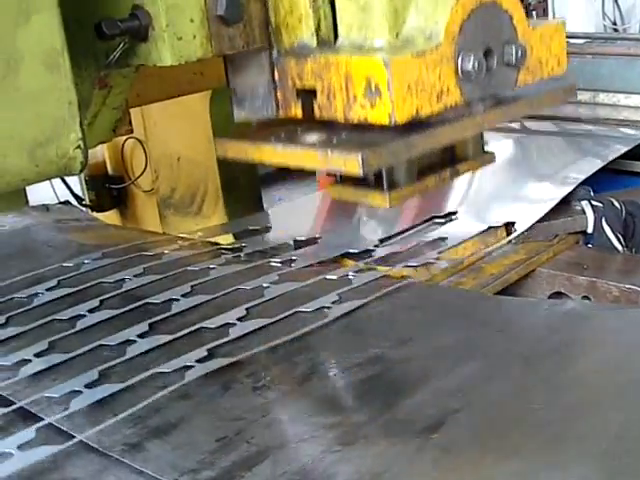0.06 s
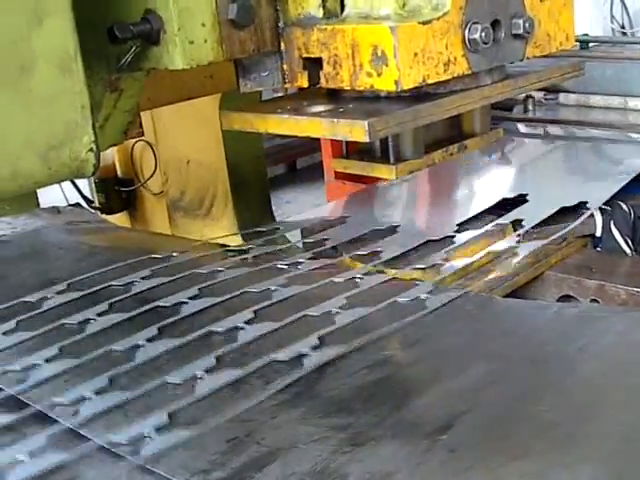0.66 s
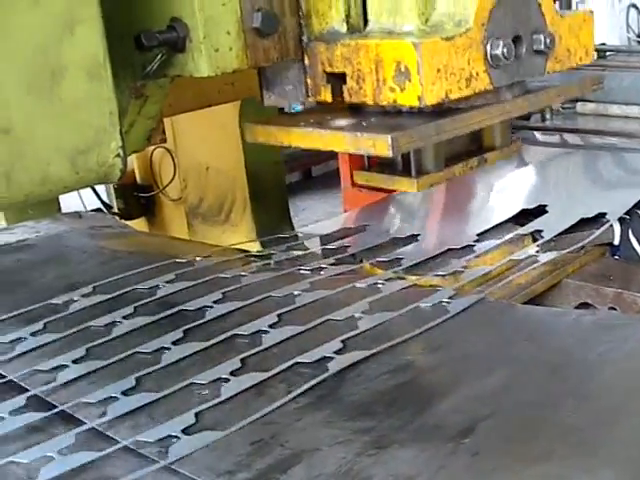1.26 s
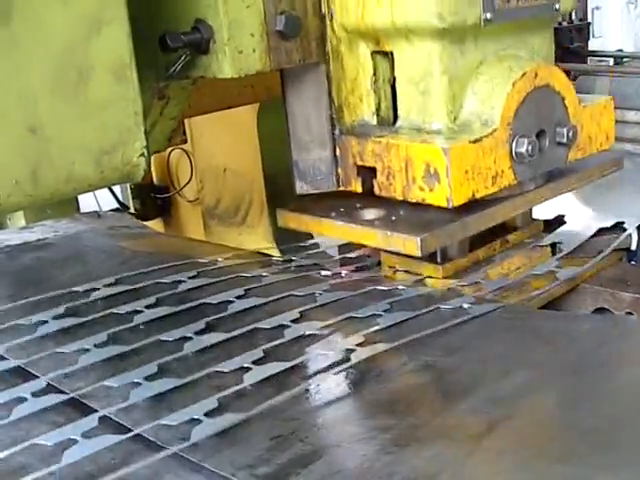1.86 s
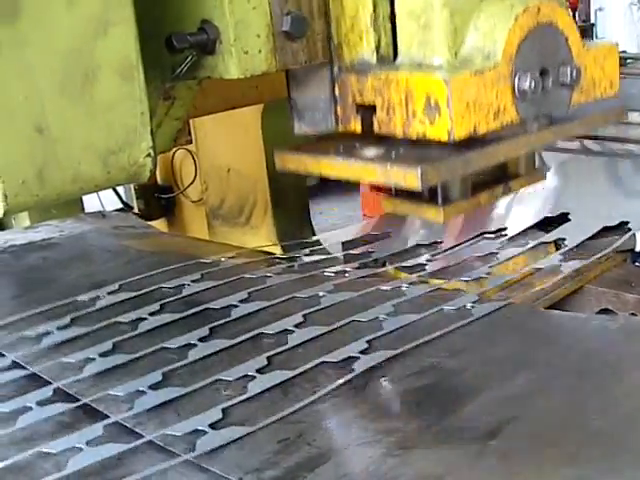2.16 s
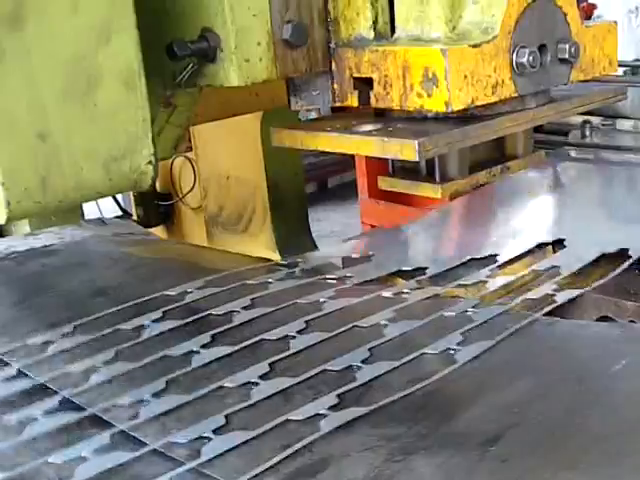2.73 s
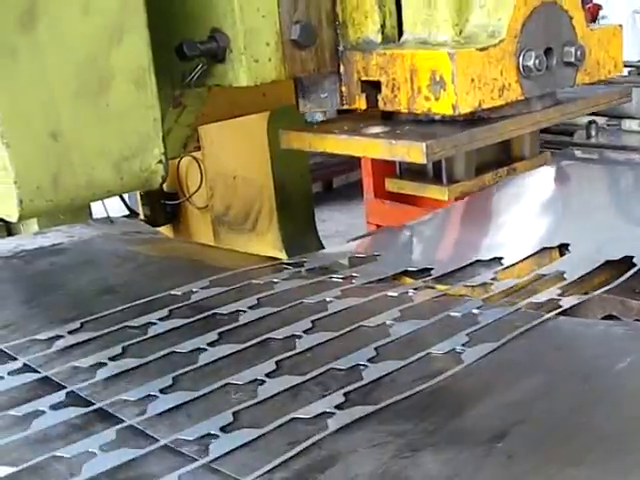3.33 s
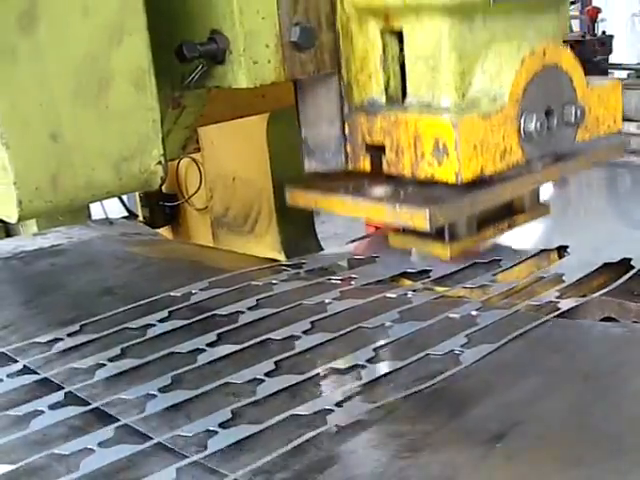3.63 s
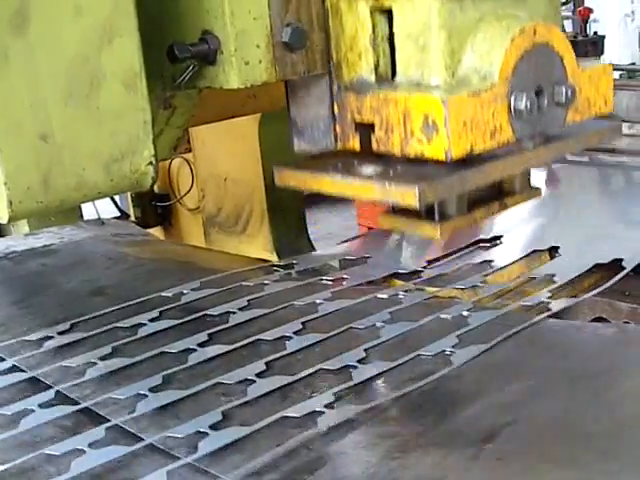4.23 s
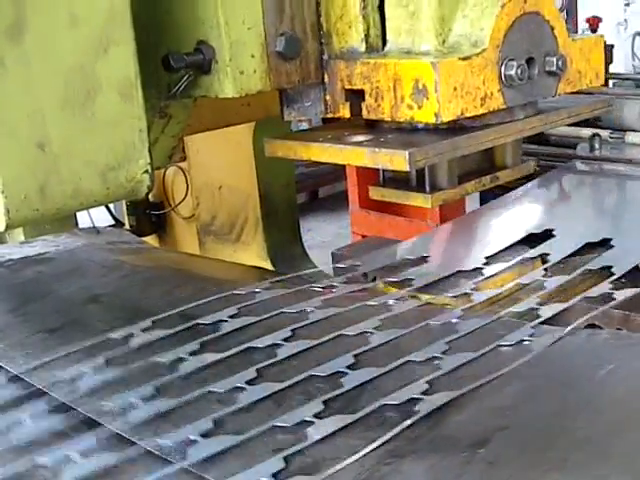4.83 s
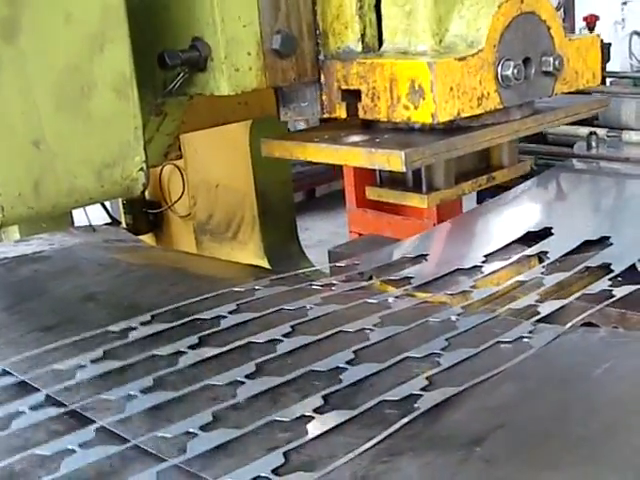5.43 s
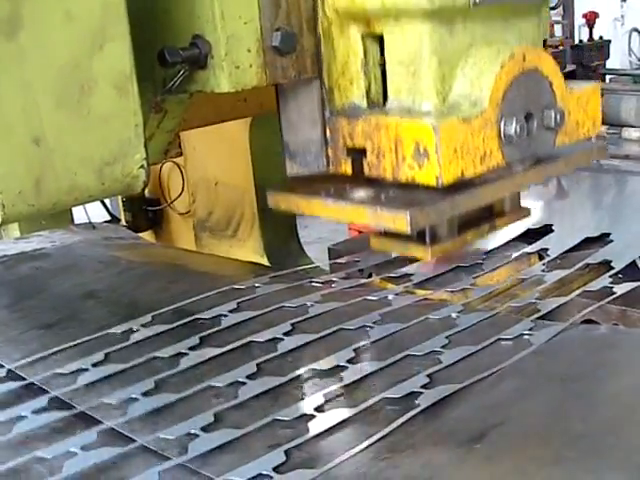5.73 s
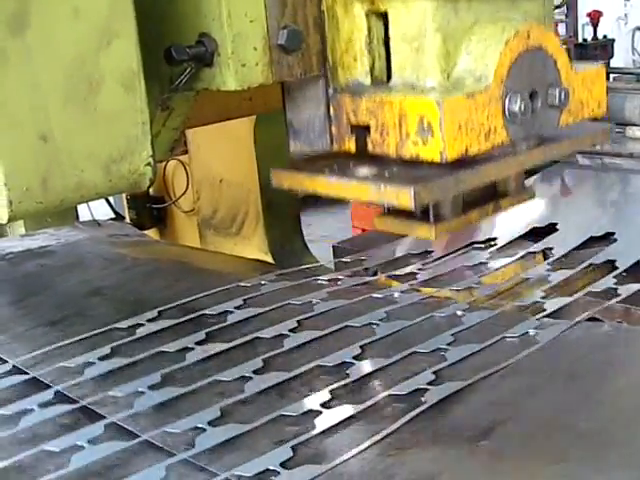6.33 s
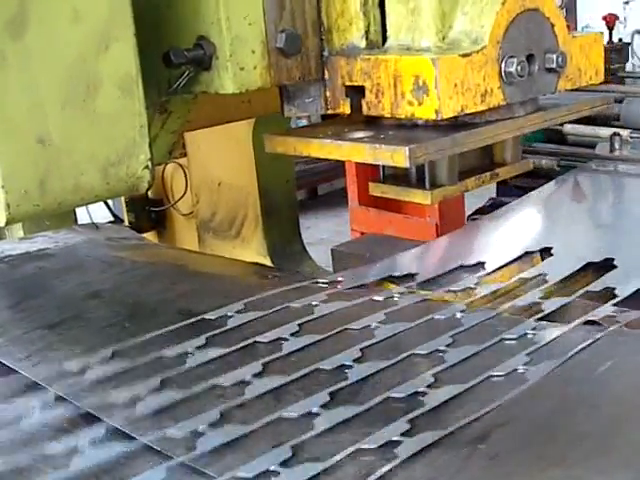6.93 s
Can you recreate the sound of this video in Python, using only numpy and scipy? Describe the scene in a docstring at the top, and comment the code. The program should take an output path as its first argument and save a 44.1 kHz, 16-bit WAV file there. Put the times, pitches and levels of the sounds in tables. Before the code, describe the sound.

Over droning factory machinery, a power press clacks, thuds and rattles through three evenly spaced strokes on a metal sheet.

```python
"""A humming workshop, where a flywheel punch press blanks a steel sheet three times.
Each cycle the clutch key clacks in, the ram grinds down, the die lands and snaps through, the frame
booms, the punch strips out with a rattle and the key ticks free. The freed flywheel rubs until the
next stroke, while the sheet buckles as it is pushed on. Gear whine swells briefly and metal squeaks.
It all comes through a narrow-band recorder that squashes the blows."""
import sys
import numpy as np
from scipy import signal
from scipy.fft import rfft, irfft, next_fast_len
from scipy.io import wavfile
from scipy.ndimage import map_coordinates

SR = 44100
rng = np.random.default_rng(int(sys.argv[2]) if len(sys.argv) > 2 else 0)


def log_audio(samples):
    """Write samples as a 16-bit WAV file to the path given in sys.argv[1]."""
    # one column per channel
    frames = np.atleast_2d(samples).T
    # limit to full scale, then quantise
    limited = np.clip(frames, -1, 1)
    pcm = np.round(limited * 32767).astype(np.int16)
    wavfile.write(sys.argv[1], SR, pcm)


N = 316638

# Room tone of the machines all round: freq_hz, level_db
SHOP_SPECTRUM = [(15, -53), (25, -24.5), (107, -9), (140, -6), (247, -4.2), (346, -4.2), (384, -10.5),
                 (418, -6.5), (549, -7.5), (802, -11.5), (929, -12), (1030, -17), (1300, -19.8),
                 (1390, -23), (3800, -28.2), (4940, -24.5), (8360, -120)]
# Whine of the drive and gears: pitch_hz, level_db, width_hz, sag_loss_db
GEAR_TONES = [(144.8, -37.5, 9.2, 0), (201.3, -35.7, 30, 0), (680, -38, 22, 1), (934.4, -39.3, 19, 1),
              (1320, -45, 27, 3), (1660, -44.5, 32, 6), (3540, -55.5, 75, 5), (3740, -52.5, 40, 5)]
# Reverb time of the hall: freq_hz, t60_s
HALL_DECAY = [(100, 0.49), (550, 1), (1200, 0.36), (2500, .35), (3800, .3)]
# Colour of its tail: freq_hz, level_db
HALL_SPECTRUM = [(50, -0.5), (140, 5), (300, 2), (430, 2), (580, 6.5), (800, 2.5), (1100, 1), (2000, -1.5),
                 (3800, -10)]
# Swells of gear whine near 1660 Hz and higher metallic squeaks: start_s, length_s, pitch_hz, level_db
WHINES_AND_SQUEAKS = [(0.3, 0.26, 1643, -37), (0.506, 0.17, 2540, -37.5), (0.78, 0.095, 1663, -34.5),
                      (2.604, 0.051, 1680, -31), (2.925, 0.057, 2490, -33.5), (3.011, 0.048, 2366, -33),
                      (6.764, 0.13, 1670, -37)]
# Pushes that buckle the sheet: start_s, level_db
SHEET_SHOVES = [(3.071, -20), (4.936, -20), (4.956, -17), (4.990, -17.5), (5.016, -17.5)]
# Hollow honk of the buckling sheet: freq_hz, level_db
BUCKLE_SPECTRUM = [(150, -14.5), (520, -14.5), (640, -7.5), (680, 14), (730, -5.5), (820, 1), (950, 1.5),
                   (1400, -9), (3800, -18)]
# Press cycles, the first already under way: start_s, extra_ring_db, extra_snap_db, extra_rub_db
PRESS_CYCLES = [(-1.025, -2, 0, 1), (1.0805, 1.5, -1.5, -1), (3.1845, 0, 0.5, 0), (5.284, -1, 2, 0.3)]
# Steel rubbing in the hub and slideways: freq_hz, level_db
SCRAPE_SPECTRUM = [(100, -10), (200, 5), (400, -11), (700, 5.5), (1100, -1), (1700, 0.5), (2050, -2.5),
                   (2450, 0), (3000, -4.5), (3750, 0.5)]
# Growl of the loaded gears: freq_hz, level_db
GRIND_SPECTRUM = [(120, -4), (200, -5.5), (500, -6.5), (690, 0), (1100, -6), (1330, -2.5), (1500, -14),
                  (1720, -2), (2000, -20), (3800, -23)]
# The key bites, rebounds, seats, later pulls free and is nicked twice: cycle_time_s, level_db, ring_db
KEY_HITS = [(0.0, 0, -22), (0.007, -8, -13), (0.032, -10, -11), (0.044, -17, -7), (0.087, -29, -14),
            (1.218, -21, -9), (1.748, -21.5, -8), (1.80, -25, -9)]
# Hard crack of the key: freq_hz, level_db
CLACK_SPECTRUM = [(60, -16.5), (130, -1.5), (300, -1.5), (420, -1), (570, 4.5), (800, 1), (1150, -1),
                  (1500, -4), (2000, -2), (3000, -8.5), (3800, -8)]
# Ringing steel of the clutch and ram: pitch_hz, level_db, t60_s
STEEL_MODES = [(555, -5, .5), (600, -5, .5), (1180, -6.5, 0.63), (1378, -13, 0.67), (1690, -20.5, 0.75),
               (2406, -2.5, 0.25), (2660, -16, 0.2), (3556, -8, 0.097), (3735, -6, 0.15)]
# Low body of the cast frame: pitch_hz, level_db, t60_s
FRAME_MODES = [(145.3, 2, 0.35), (120, -10, .3), (104.5, -9, 0.26), (196, -18.5, 1)]
# The die lands, beds down and breaks through: cycle_time_s, level_db, snap_db
DIE_HITS = [(0.548, -9, -10), (0.558, -13, -9), (0.575, -7, 2)]
# Weight of the die's blow: freq_hz, level_db
CRUNCH_SPECTRUM = [(40, -21), (120, 1), (200, 5.5), (330, 7), (420, 5), (600, 5), (1300, -1), (2000, -8),
                   (3000, -12.5), (3800, -18.5)]
# Bright edge of the cut: freq_hz, level_db
SNAP_SPECTRUM = [(500, -25), (1500, -15), (2400, 0), (3000, 12), (3800, -7.5)]
# The loose sheet bouncing on the table: freq_hz, level_db
RATTLE_SPECTRUM = [(80, -15), (200, -7), (550, 1), (1000, -4.5), (1600, -6.5), (2500, -14.5), (3800, -18)]
# The punch pulls out and the sheet slaps back: cycle_time_s, level_db
STRIP_HITS = [(0.683, -16.5), (0.703, -18.5), (0.742, -24)]
# Colour of each slap: freq_hz, level_db
SLAP_SPECTRUM = [(100, -7), (300, 1.5), (600, 3), (1100, 4.5), (1600, -5.5), (2500, -12), (3800, -18)]
# The recorder's steep top edge and faint mirror band: freq_hz, gain_db
BAND_EQ = [(3790, 0), (3880, -9), (3960, -30), (4040, -36), (4150, -20), (4260, -14), (4400, -24),
           (4600, -48), (4850, -100)]
# Its presence lift: freq_hz, gain_db
PRESENCE_EQ = [(300, -.5), (1000, 1.59), (3000, 6.5)]


def amp(db):
    """Decibels to gain."""
    return 10 ** (np.asarray(db) / 20)


def unit(x):
    """Scale to rms 1."""
    return x / np.sqrt(np.mean(x ** 2) + 1e-20)


def along(points, hz):
    """Read a curve of (freq_hz, value) points on a log frequency axis."""
    freqs, values = np.transpose(points)
    return np.interp(np.log(hz + 1), np.log(freqs + 1), values)


def cycle_time():
    """Seconds since the cycle began, for every sample."""
    t, starts = np.arange(N) / SR, np.array(PRESS_CYCLES)[:, 0]
    return t - starts[np.searchsorted(starts, t) - 1]


def each_cycle(centre_s, width_s):
    """A smooth bump from 0 to 1 and back at the same point of every cycle."""
    return np.exp(-((cycle_time() - centre_s) / width_s) ** 2)


def wobble(rate_hz, size=N):
    """A smooth random modulator of rms 1."""
    return unit(map_coordinates(rng.standard_normal(4096), [np.arange(size) * rate_hz / SR], mode="wrap"))


def filtered(x, response):
    """EQ x with a gain given as a function of frequency."""
    size = next_fast_len(len(x) + 8192)
    return irfft(rfft(x, size) * response(np.fft.rfftfreq(size, 1 / SR)), size)[:len(x)]


def noise(spectrum, size):
    """Coloured noise of rms 1, cut off at 4800 Hz."""
    return unit(filtered(rng.standard_normal(size), lambda hz: amp(along(spectrum, hz)) * (hz < 4800)))


def add(track, start_s, sound):
    """Mix a sound in, dropping what falls outside the track."""
    start = round(start_s * SR)
    heard = sound[max(-start, 0):]
    part = track[max(start, 0):][:len(heard)]
    part += heard[:len(part)]


def decay(t60_s):
    """A one-second envelope that dies away exponentially."""
    return amp(-60 * np.arange(SR) / SR / t60_s)


def attack(rise_s):
    """A one-second envelope that softens the onset."""
    return 1 - np.exp(-np.arange(SR) / SR / rise_s)


def ring(modes, loose_rad):
    """Struck metal; loose parts chatter and make each mode waver in phase."""
    out, t = np.zeros(SR), np.arange(SR) / SR
    for hz, db, t60_s in modes:
        envelope = amp(db + rng.standard_normal()) * decay(t60_s)
        out += envelope * np.sin(2 * np.pi * hz * t + loose_rad * wobble(90, size=SR))
    return out


def in_hall(sound, wet_db):
    """Add a fresh reverb tail; the low mids linger longest."""
    hz, t, bands = signal.stft(noise(HALL_SPECTRUM, SR), SR, nperseg=256)
    fade = amp(-60 * t / along(HALL_DECAY, hz)[:, None])
    tail = signal.istft(bands * fade, SR, nperseg=256)[1][:SR] * attack(0.015)
    return sound + amp(wet_db) * signal.fftconvolve(sound, tail / np.linalg.norm(tail))[:SR]


def workshop():
    """A bed of machine roar; motor throb and upper gear tones duck as the drive slows after each cut."""
    t, motor_hz = np.arange(N) / SR, 48.6
    sag = each_cycle(centre_s=1.02, width_s=0.3)
    roar = amp(-25.6 + 0.51 * wobble(6.7)) * noise(SHOP_SPECTRUM, N)
    throb_db = -44 - 10 * sag + 1.5 * wobble(4)
    throb = amp(throb_db) * unit(np.sin(2 * np.pi * motor_hz * t + .5 * wobble(11)))
    whine = np.zeros(N)
    for hz, db, width_hz, sag_loss_db in GEAR_TONES:
        waver = 0.66 + wobble(width_hz) + 1j * wobble(width_hz)  # uneven meshing shakes level and phase
        whine += amp(db - sag_loss_db * sag) * unit(np.real(waver * np.exp(2j * np.pi * hz * t)))
    return roar + throb + whine


def whines_and_squeaks():
    """Brief swells of wavering gear whine, plus a few higher metallic squeaks."""
    out, t = np.zeros(N), np.arange(SR) / SR
    for start_s, length_s, hz, db in WHINES_AND_SQUEAKS:
        swell = np.sqrt(np.abs(np.sin(np.pi * np.minimum(t / length_s, 1))))
        tone = unit(np.sin(2 * np.pi * hz * t + .9 * wobble(110, size=SR)))
        add(out, start_s, amp(db) * swell * tone)
    return out


def sheet():
    """The thin plate buckles as it is pushed on."""
    out = np.zeros(N)
    for start_s, db in SHEET_SHOVES:
        add(out, start_s, amp(db) * noise(BUCKLE_SPECTRUM, SR) * decay(0.26) * attack(0.007))
    return out


def flywheel():
    """The free wheel rubs on its hub, catching and slipping, louder as it regains speed."""
    free_s, spin_up_s = 1.17, 0.27
    speed = 1 - np.exp(-np.maximum(cycle_time() - free_s, 0) / spin_up_s)
    catching = unit(amp(0.88 * wobble(220) + 1.1 * wobble(30)))
    starts, _, _, extra_rub_db = np.transpose(PRESS_CYCLES)
    rub_db = -29.5 + extra_rub_db[np.searchsorted(starts, np.arange(N) / SR) - 1]
    scuff_db = 3.5 * each_cycle(centre_s=1.82, width_s=0.05)
    return speed * amp(rub_db + scuff_db) * catching * noise(SCRAPE_SPECTRUM, N)


def ram():
    """The slideways hiss as the ram gathers speed, and the loaded gears grind near the bottom."""
    t = cycle_time()
    begin_s, full_s, ease_s, end_s = 0.41, 0.5, 0.55, 0.65
    load = np.interp(t, [begin_s, full_s, ease_s, end_s], [0, 1, 1, 0])
    speed = np.interp(t, [0, ease_s, end_s], [0, 1, 0])
    grind = amp(-24) * load * noise(GRIND_SPECTRUM, N)
    hiss = amp(-34.5) * speed * noise(SCRAPE_SPECTRUM, N)
    return grind + hiss


def clutch():
    """The key slams into the flywheel: a hard crack, ringing steel and a nudge to the frame."""
    out = np.zeros(N)
    for start_s, extra_ring_db, _, _ in PRESS_CYCLES:
        for hit_s, db, ring_db in KEY_HITS:
            crack = noise(CLACK_SPECTRUM, SR) * decay(0.056) * attack(.004)
            steel = amp(ring_db + extra_ring_db) * ring(STEEL_MODES, loose_rad=0.9) * attack(0.0025)
            nudge = amp(-19.5) * ring(FRAME_MODES, loose_rad=0.18) * attack(0.035)
            add(out, start_s + hit_s, amp(db) * (in_hall(crack, wet_db=-11.5) + steel + nudge))
    return out


def punch():
    """The die cuts, the strained frame springs back with a boom, and the sheet rattles and slaps."""
    out, boom_s = np.zeros(N), 0.580
    for start_s, _, extra_snap_db, _ in PRESS_CYCLES:
        for hit_s, db, snap_db in DIE_HITS:
            crunch = noise(CRUNCH_SPECTRUM, SR) * decay(0.15) * attack(0.00072)
            snap = amp(snap_db + extra_snap_db) * noise(SNAP_SPECTRUM, SR) * decay(0.03) * attack(0.0059)
            add(out, start_s + hit_s, amp(db) * in_hall(crunch + snap, wet_db=-13))
        chatter = unit(amp(2.7 * wobble(110, size=SR)))  # the sheet bounces on the shaking table
        rattle = amp(-7.5) * chatter * noise(RATTLE_SPECTRUM, SR) * decay(0.47)
        steel = amp(-17) * ring(STEEL_MODES, loose_rad=0.9)
        boom = amp(6.5) * ring(FRAME_MODES, loose_rad=0.073)
        add(out, start_s + boom_s, amp(-9.5) * (boom + rattle + steel) * attack(0.017))
        for hit_s, db in STRIP_HITS:
            slap = in_hall(noise(SLAP_SPECTRUM, SR) * decay(0.084) * attack(0.00073), wet_db=-5)
            clink = amp(-16) * ring(STEEL_MODES, loose_rad=.6)
            add(out, start_s + hit_s, amp(db) * (slap + clink))
    return out


def limiter(x, ceiling_db, release_db_per_s, attack_s):
    """Peaks over the ceiling duck the gain, which climbs back at a steady rate."""
    over_db = np.maximum(20 * np.log10(np.abs(x) + 1e-9) - ceiling_db, 0)
    release_db = release_db_per_s * np.arange(N) / SR
    duck_db = np.maximum.accumulate(over_db + release_db) - release_db
    pole = np.exp(-1 / (attack_s * SR))
    return x * amp(-signal.lfilter([1 - pole], [1, -pole], duck_db))


def scene():
    """The press over the workshop bed, in mono."""
    return (clutch() + punch() + ram() + flywheel() + sheet() + whines_and_squeaks() + workshop())[None]


def record(dry):
    """A limiter rides the blows and the input saturates; the band ends near 4 kHz and tall peaks clip."""
    held = limiter(dry[0], ceiling_db=-4.5, release_db_per_s=430, attack_s=0.0059)
    ceiling, hardness, top_hz = .52, 5, 15800
    saturated = held / (1 + np.abs(held / ceiling) ** hardness) ** (1 / hardness)
    narrow = filtered(saturated, lambda hz: amp(along(BAND_EQ, hz) + along(PRESENCE_EQ, hz)))
    clipped = np.clip(narrow, -.72, .72)
    return filtered(clipped, lambda hz: hz < top_hz)[None]


dry = scene()
out = record(dry)
log_audio(out)
```